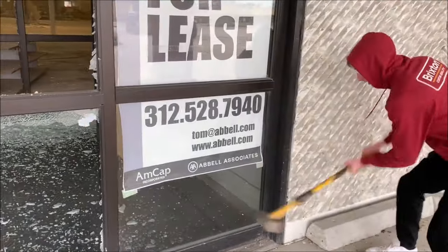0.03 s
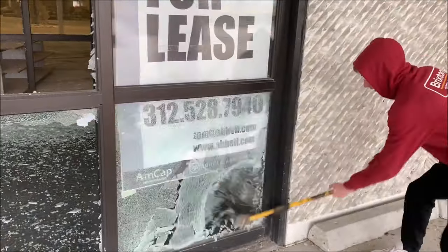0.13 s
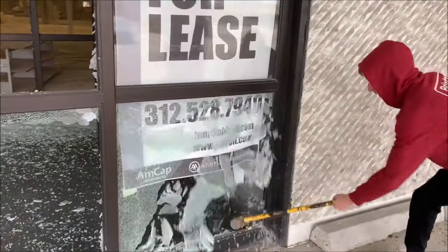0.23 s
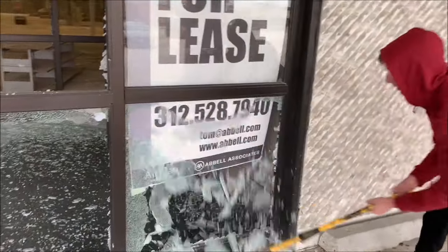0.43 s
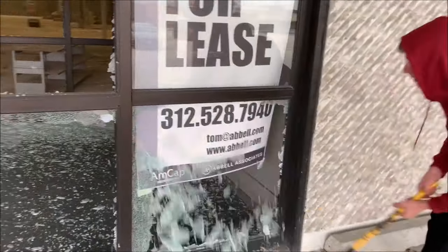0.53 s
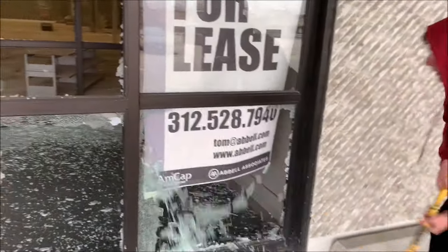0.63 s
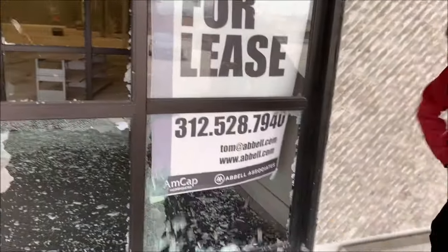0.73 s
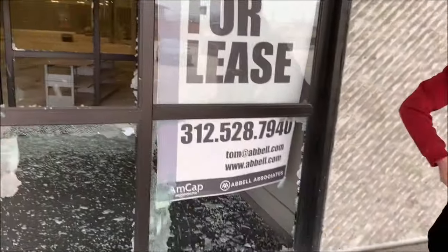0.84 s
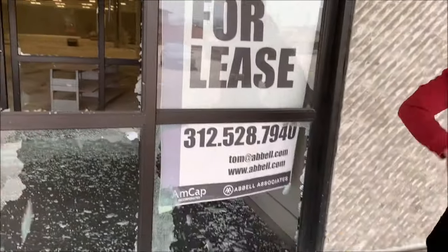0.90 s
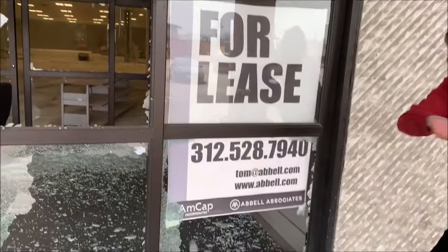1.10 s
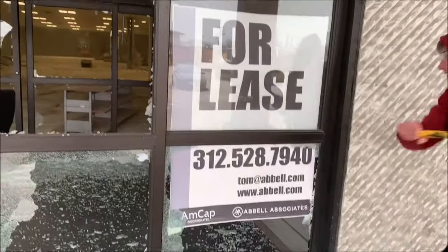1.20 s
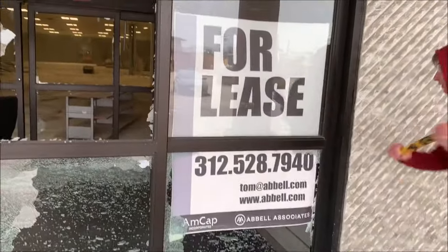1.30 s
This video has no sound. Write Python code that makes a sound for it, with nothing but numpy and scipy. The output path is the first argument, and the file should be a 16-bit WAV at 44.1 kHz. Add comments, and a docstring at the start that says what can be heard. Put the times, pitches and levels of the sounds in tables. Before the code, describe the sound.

Glass pane shattering under a heavy hammer blow, fragments clattering and tinkling onto sill and pavement

```python
"""A sledgehammer bursts a tempered shop window a few metres away: crack, thump of the pane, rattling frame.
The crack is clicks and dispersive chirps; pane, frame and sill are damped modes; rattles are resonant bursts.
Crumbs and chips pour onto sill and pavement as random clicks and decaying sines over a low flutter.
Slabs clack with two modes each, and clumps splinter as resonant bursts of contacts.
The empty shop answers with a short tail of decaying noise; filtered noise gives a low outdoor rumble."""
import sys
import numpy as np
from scipy import signal
from scipy.fft import rfft, irfft
from scipy.io import wavfile

SR = 44100
rng = np.random.default_rng(int(sys.argv[2]) if len(sys.argv) > 2 else 0)


def master_out(mix):
    """Clip the mix to full scale and print it as 16-bit PCM to the path in sys.argv[1]."""
    frames = np.transpose(np.atleast_2d(mix))
    ceiling = np.clip(frames, -1, 1)
    pcm = np.round(ceiling * 32767).astype(np.int16)
    wavfile.write(sys.argv[1], SR, pcm)


N = 59535  # samples

# spectrum of a fracture chirp: frequency_hz, gain_db
SNAP_COLOUR = [(1500, -52), (2800, -4), (4200, 3.5), (5500, 7), (7000, -13), (10500, 0.5), (12000, -11),
               (14000, -11), (16000, -29)]


def snap(origin_s, level_db, lag_s):
    """Dispersion: bending waves in glass go faster at high pitch, so a fracture is heard as a falling chirp."""
    hz = np.maximum(np.fft.rfftfreq(N, 1 / SR), 1)
    arrival_s = origin_s + lag_s * np.sqrt(1e4 / hz)
    # the phase is the running sum of the arrival time over frequency
    phase = 2 * np.pi * np.cumsum(arrival_s) * SR / N
    left = amp(over_hz(SNAP_COLOUR)) * np.exp(-1j * phase)
    right = left * np.exp(-1j * over_hz(LEAD))
    chirp = irfft(np.array([left, right]), N)
    # level_db sets the energy of both channels together, as if spread over 10 ms
    return amp(level_db) * chirp / np.sqrt(np.sum(chirp ** 2) / (.01 * SR))


# fractures that snap through the pane: origin_s, level_db, lag_s of the 10 kHz part
SNAPS = [(.2020, -12.5, .0021), (0.2052, -23, 0.0029)]
# spectrum of the crack: frequency_hz, gain_db
CRACK_COLOUR = [(300, -2.5), (1200, 0), (2600, -6.5), (4200, 0.5), (6000, -2), (8000, -3), (11000, -26),
                (15000, -39)]
CRACK_S, CRACK_DB, CRACK_RISE_S, CRACK_T60_S = 0.2026, -13, 0.0036, 0.042
CRACK_PAN_DB = -1.5  # left over right


def crack():
    """Brittle fracture: dense random contacts in one brief burst, joined by dispersive chirps."""
    contacts = colour(crackle(20000, 1.2), CRACK_COLOUR)
    sound = burst(contacts, CRACK_S, CRACK_DB, CRACK_RISE_S, CRACK_T60_S)
    for origin_s, level_db, lag_s in SNAPS:
        sound = sound + snap(origin_s, level_db, lag_s)
    return sound * pan(CRACK_PAN_DB)


# bending modes of the pane, before the pitch factor: frequency_hz, relative level_db, t60_s
PANE = [(46.7, -14, 0.1), (108.5, -11.5, 0.15), (230.6, 5, 0.035), (298.7, 4, 0.031)]
# the hammer strikes the pane, then the frame: delay_s after THUMP_S, relative level_db, pitch factor
SHOVES = [(0, -4, 1.0), (0.0545, -16.5, 1.25)]
THUMP_S, THUMP_DB, THUMP_RISE_S = .2068, 2, 0.0044
THUMP_PAN_DB = 5.5  # left over right


def thump():
    """Modal vibration: each shove sets the pane's bending modes ringing as damped sines."""
    sound = 0
    for delay_s, level_db, pitch in SHOVES:
        t = np.maximum(times() - THUMP_S - delay_s, 0)
        onset = 1 - np.exp(-t / THUMP_RISE_S)
        # scaling time raises the pitch and shortens the decay together
        sound = sound + amp(THUMP_DB + level_db) * ring(PANE, pitch * t) * onset
    return sound * pan(THUMP_PAN_DB)


# rattles of the glass edge in its frame: start_s, level_db, strongest_hz, t60_s
RATTLES = [(0.206, -17, 940, 0.031), (0.2135, -17.5, 1390, 0.04), (0.222, -15.5, 1950, 0.022),
           (0.2263, -23.5, 700, 0.025), (0.233, -22, 1400, 0.045), (.2428, -24, 2000, 0.014),
           (.2495, -28.5, 800, .04), (0.259, -23, 980, 0.076), (0.267, -31, 1700, 0.054),
           (0.274, -31, 900, 0.043)]
# spectrum of the edge contacts: frequency_hz, gain_db
RATTLE_COLOUR = [(80, -5), (300, 3.5), (480, -8), (1000, -6), (1500, -5.5), (2100, -2.5), (2700, -13.5),
                 (6000, -22), (15000, -8)]
# ringing of frame and hammer: frequency_hz, relative level_db, t60_s
FRAME = [(620, 13, 0.2), (740, 12, 0.19), (1020, -4, 0.14), (1340, 15, 0.073), (1610, 6, 0.052),
         (1820, 12, 0.11)]
RATTLE_WIDTH = 0.69  # share of the strongest frequency
FRAME_RING_DB = -17.5  # relative to the rattles


def rattle():
    """Repeated impact: bursts of edge contacts excite the resonances of frame and hammer."""
    edge = colour(crackle(9000, 0.79), RATTLE_COLOUR)
    sound = 0
    for start_s, level_db, hz, t60_s in RATTLES:
        sound = sound + burst(resonate(edge, hz, RATTLE_WIDTH), start_s, level_db, 0.00023, t60_s)
    return with_ring(sound, FRAME, FRAME_RING_DB)


def blow():
    """Fracture and impact: cracks race through the pane, which bends with a thump and rattles its frame."""
    return crack() + thump() + rattle()


CHIPS_PER_S, CHIP_LOW_HZ, CHIP_HIGH_HZ = 1200, 3640, 14870
CHIP_CYCLES = 18  # a chip falls to 1/e of its amplitude in this many cycles


def chips():
    """Free vibration: each loose chip tinkles at its own pitch and decays over a fixed number of cycles."""
    t = np.arange(2048) / SR
    out = np.zeros(N + len(t))
    for when, pitch, size in rng.random((int(CHIPS_PER_S * N / SR), 3)):
        hz = CHIP_LOW_HZ * (CHIP_HIGH_HZ / CHIP_LOW_HZ) ** pitch
        start = int(when * N)
        gain = amp(31 * size ** 3)  # mostly small, a few up to 31 dB stronger
        out[start:start + len(t)] += gain * np.sin(2 * np.pi * hz * t) * np.exp(-hz * t / CHIP_CYCLES)
    return unit(out[:N])


# flow of falling crumbs and chips: time_s, level_db
POUR = [(.205, -52), (.238, -32), (.247, -40), (.264, -28.5), (.305, -52), (.365, -49), (.395, -39.5),
        (.43, -30.5), (.525, -26), (.553, -28.5), (.575, -22), (.608, -18), (.655, -25.5), (.735, -22),
        (.775, -26), (.80, -22.5), (.90, -29.5), (.99, -30), (1.09, -38), (1.145, -34.5), (1.21, -38.5),
        (1.35, -42)]
# spectrum of the crumbs: frequency_hz, gain_db
CRUMB_COLOUR = [(400, -10), (1200, 5), (2250, -1), (2850, -5), (3800, 2.5), (5000, -0.5), (6200, 0),
                (8500, 1.5), (11000, -2), (15000, -2)]
# low flutter of the sagging sheet: time_s, level_db
SAG = [(.21, -24), (.275, -27), (.315, -45.5), (.375, -31.5), (.46, -35.5), (.545, -32.5), (.60, -81),
       (.74, -43), (.80, -43.5), (.95, -57)]
# spectrum of the flutter: frequency_hz, gain_db
SAG_COLOUR = [(25, -15), (70, -6), (110, 5), (160, -2), (240, 0.5), (350, 0), (520, -14), (2000, -63)]
CRUMBS_PER_S, CRUMB_SPREAD_DB = 7000, 3
CHIP_DB = -7  # relative to the crumbs
GLASS_PAN_DB = -0.5  # left over right


def shower():
    """Random superposition: many small impacts of crumbs and chips merge over the flutter of the sheet."""
    sag = unit(colour(crackle(2500, 3.9), SAG_COLOUR)) * flow(SAG)
    crumbs = unit(colour(crackle(CRUMBS_PER_S, CRUMB_SPREAD_DB), CRUMB_COLOUR))
    falling = crumbs + amp(CHIP_DB) * spread(chips)
    return sag + falling * flow(POUR) * pan(GLASS_PAN_DB)


# slabs landing flat: start_s, level_db, lower_hz, upper_hz, upper over lower level_db, t60_s
SLABS = [(.385, -33, 620, 1250, -5, .04), (.451, -30, 800, 1400, -3, .04),
         (.528, -17.5, 660, 1080, -1, .042), (.575, -19.5, 595, 1170, -4, .05),
         (.6125, -14.5, 690, 1120, -9, .045), (.633, -22.5, 880, 1360, 2, .04),
         (.6758, -18, 660, 1100, 5, .045), (.682, -21, 295, 900, -4, .07),
         (.7398, -14, 670, 1170, -1, .036), (.748, -26, 590, 1130, 3, .05), (.757, -22, 930, 1250, -8, .05),
         (.812, -27, 800, 1180, 2, .045), (.929, -27, 780, 1350, 0, .03), (.9355, -26, 1150, 2150, -3, .03),
         (1.0278, -23, 1150, 1930, -2, .042), (1.2352, -34, 930, 2060, 9, .016)]
# slabs are too small to radiate bass: frequency_hz, gain_db
SLAB_LOW_CUT = [(70, -40), (160, -1), (260, 0.5)]
SLAB_RISE_S, SLAB_GRIT_DB = .0005, -5  # grit relative to each slab's level_db
SLAB_WIDTH = 1.1  # share of the upper mode's frequency


def slabs():
    """Plate modes: each landing slab sounds two damped modes, with contact grit filtered around both."""
    contacts = crackle(9000, 0.89)
    sound = 0
    for start_s, level_db, low_hz, high_hz, high_db, t60_s in SLABS:
        t = np.maximum(times() - start_s, 0)
        modes = [(low_hz, level_db, t60_s), (high_hz, level_db + high_db, t60_s)]
        tone = ring(modes, t) * (1 - np.exp(-t / SLAB_RISE_S))
        grit = resonate(resonate(contacts, high_hz, SLAB_WIDTH), low_hz, 2.8)
        sound = sound + tone + burst(grit, start_s, level_db + SLAB_GRIT_DB, SLAB_RISE_S, t60_s)
    return colour(sound, SLAB_LOW_CUT)


# coarse pieces tumbling on the sill: time_s, level_db
TUMBLE = [(.22, -32), (.29, -31.5), (.335, -45), (.40, -35.5), (.46, -37), (.50, -34.5), (.55, -30.5),
          (.60, -22.5), (.655, -31.5), (.725, -24), (.76, -29.5), (.785, -33.5), (.87, -31), (.91, -37.5),
          (1.0, -38.5), (1.09, -57), (1.14, -50), (1.22, -50), (1.35, -50.5)]
# spectrum of the tumbling pieces: frequency_hz, gain_db
SILL_COLOUR = [(70, -48), (160, -6), (240, -4), (320, 1), (460, -3.5), (660, 0.5), (850, -3), (1130, -3),
               (1600, -14), (2200, -6), (3000, -14.5), (8000, -34.5)]
# ringing of the metal sill under the falling glass: frequency_hz, relative level_db, t60_s
SILL = [(628, -2, 0.052), (705, -8, 0.34), (826, 1, 0.24), (938, 4.5, 0.48), (1089, 11, 0.075),
        (1190, 4.5, 0.14), (1314, 21, 0.066)]
PIECES_PER_S, PIECE_SPREAD_DB = 1500, 2.5
SILL_RING_DB = -11  # relative to the falling glass
SILL_PAN_DB = -1.5  # left over right


def sill():
    """Forced resonance: tumbling pieces and clacking slabs set the modes of the metal sill ringing."""
    tumble = unit(colour(crackle(PIECES_PER_S, PIECE_SPREAD_DB), SILL_COLOUR)) * flow(TUMBLE)
    return with_ring(tumble + slabs(), SILL, SILL_RING_DB) * pan(SILL_PAN_DB)


# clumps splintering on the pavement: start_s, level_db, strongest_hz, width as a share of it, t60_s
CLUMPS = [(.385, -31, 3800, 0.25, 0.012), (0.406, -35, 8000, 2.2, .05), (0.523, -22, 7000, 2, .05),
          (0.564, -21.5, 5900, 2.5, 0.1), (.6758, -21.5, 2120, 0.27, 0.085),
          (0.729, -20.5, 4400, 1.3, 0.075), (0.961, -20.5, 5300, 1.1, 0.037),
          (1.1113, -20.5, 4870, 1.06, 0.025), (1.1098, -29.5, 1630, 0.8, 0.12),
          (1.1137, -29.5, 2200, 5.9, 0.079), (1.128, -32, 4000, 3.5, 0.016), (1.164, -24.5, 9000, 3, 0.04),
          (1.168, -23.5, 11200, 0.64, 0.0088), (1.2355, -29.5, 3440, 0.2, 0.012),
          (1.2367, -28, 4340, 0.087, 0.013), (1.2647, -28.5, 4400, 0.3, 0.0072)]
CLUMP_RISE_S = 0.00021


def clumps():
    """Band-limited impact: each clump of crazed glass splinters as a resonant burst of contacts."""
    contacts = crackle(9000, 2.3)
    sound = 0
    for start_s, level_db, hz, width, t60_s in CLUMPS:
        sound = sound + burst(resonate(contacts, hz, width), start_s, level_db, CLUMP_RISE_S, t60_s)
    return pan(GLASS_PAN_DB) * sound


# spectrum of the shop's answer: frequency_hz, gain_db
SHOP_COLOUR = [(100, -10), (300, -15), (700, -16), (1800, 0.5), (4000, -4.0), (14000, 0)]
SHOP_DB, SHOP_T60_S, SHOP_DELAY_S = -12, 0.41, 0.015


def shop(x):
    """Reverberation: convolution with delayed, exponentially decaying noise gives the empty shop's answer."""
    t = times() - SHOP_DELAY_S
    noise = colour(rng.standard_normal((2, N)), SHOP_COLOUR)
    shape = fade(t, SHOP_T60_S) * (t > 0)
    tail = noise * shape / np.linalg.norm(shape)
    return amp(SHOP_DB) * signal.fftconvolve(x, tail, axes=1)[:, :N]


# spectrum of the outdoor rumble: frequency_hz, gain_db
STREET = [(25, -23), (66, -8.5), (135, -6.5), (180, -2.5), (240, -9.5), (330, -3.5), (400, -17),
          (700, -19.5), (1200, -25), (3000, -34.5), (9000, -39.5), (15000, -44)]
STREET_DB = -46.5


def street():
    """Stationary noise: a steady low outdoor rumble is random noise with a fixed spectrum."""
    noise = spread(lambda: rng.standard_normal(N))
    return amp(STREET_DB) * unit(colour(noise, STREET))


def amp(db):
    """Level law: decibels to amplitude gain."""
    return 10 ** (np.asarray(db) / 20)


def unit(x):
    """Normalisation: scale to rms 1."""
    return x / np.sqrt(np.mean(x ** 2) + 1e-18)


def times():
    """Sampling: the clock in seconds."""
    return np.arange(N) / SR


def over_hz(points):
    """Logarithmic interpolation: read a table of frequency_hz, value at every frequency bin."""
    hz, value = np.array(points).T
    bins_hz = np.fft.rfftfreq(N, 1 / SR) + 1e-9
    return np.interp(np.log(bins_hz), np.log(hz), value)


def colour(x, points):
    """Linear filtering: weight the spectrum by a table of frequency_hz, gain_db."""
    return irfft(rfft(x) * amp(over_hz(points)), N)


def flow(points):
    """Amplitude envelope: gain along a table of time_s, level_db, silent before its first row."""
    s, db = np.array(points).T
    return amp(np.interp(times(), s, db)) * (times() >= s[0])


def pan(db):
    """Level difference: left and right gains, db being left over right."""
    return amp(np.array([[db], [-db]]) / 2)


def fade(t, t60_s):
    """Exponential damping: 60 dB down t60_s after time zero."""
    return np.exp(-np.log(1000) * np.maximum(t, 0) / max(t60_s, 1e-3))


def ring(modes, t):
    """Modal superposition: damped sines that start at time zero."""
    return sum(amp(db) * np.sin(2 * np.pi * hz * np.maximum(t, 0)) * fade(t, t60) for hz, db, t60 in modes)


def with_ring(x, modes, db):
    """Resonant response: add the ringing of a body that x strikes, db relative to x."""
    response = signal.fftconvolve(x, ring(modes, times())[None], axes=1)[:, :N]
    return x + amp(db) * np.std(x) * unit(response)


def resonate(x, hz, width):
    """Single resonance: a second-order band-pass whose width is a share of its frequency."""
    g = np.tan(np.pi * min(hz / SR, .45))
    numerator = [g * width, 0, -g * width]
    denominator = [1 + g * width + g * g, 2 * g * g - 2, 1 - g * width + g * g]
    return signal.lfilter(numerator, denominator, x)


def burst(x, top_s, db, rise_s, t60_s):
    """Transient envelope: a stream swells exponentially to its level db at top_s, then dies away."""
    t = times() - top_s
    shape = np.exp(np.minimum(t, 0) / max(rise_s, 1e-4)) * fade(t, t60_s)
    return amp(db) * unit(x * shape) * np.sqrt(np.mean(shape ** 2))


def clicks(rate, spread_db):
    """Random impulses: contacts of either sign, many small and a few large."""
    size = amp(spread_db * np.minimum(rng.exponential(size=N), 4))
    sign = np.sign(rng.standard_normal(N))
    struck = rng.random(N) < rate / SR
    return unit(size * sign * struck)


# likeness of the two microphones: frequency_hz, share of power in common (0-1)
LIKENESS = [(50, 0.65), (200, 1), (1100, 0.58), (2200, 0.93), (3200, 0.52), (6000, 0.16), (9000, 0.24),
            (11000, 0.61), (15000, 1)]
# phase by which the left microphone leads: frequency_hz, lead_rad
LEAD = [(100, 0.5), (1550, 0.5), (2800, 2), (3500, -0.7), (4200, -1.5), (5200, 2), (6600, 8), (7100, 8),
        (7600, 4), (9500, 2), (12000, -3.5), (15300, -9.5)]


def spread(draw):
    """Partial coherence: two microphones share one part with a phase lead, and each has a part of its own."""
    shared, left, right = (rfft(draw()) for _ in range(3))
    alike = np.clip(over_hz(LIKENESS), 0, 1)
    common = np.array([shared, shared * np.exp(-1j * over_hz(LEAD))])
    own = np.array([left, right])
    return irfft(np.sqrt(alike) * common + np.sqrt(1 - alike) * own, N)


def crackle(rate, spread_db):
    """Scattered impacts: a stereo stream of random contacts."""
    return spread(lambda: clicks(rate, spread_db))


def scene():
    """Superposition: the blow, the falling glass, the shop and the street."""
    glass = blow() + shower() + sill() + clumps()
    return glass + shop(glass) + street()


TOP_HZ = 15800


def record(dry):
    """Limiting and low-pass filtering: the recorder clips peaks below full scale, then cuts the top."""
    low_pass = signal.ellip(8, .2, 80, TOP_HZ, fs=SR, output="sos")
    return signal.sosfilt(low_pass, np.clip(dry, -.88, .88))


dry = scene()
out = record(dry)
master_out(out)
```